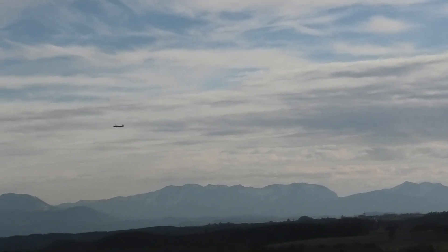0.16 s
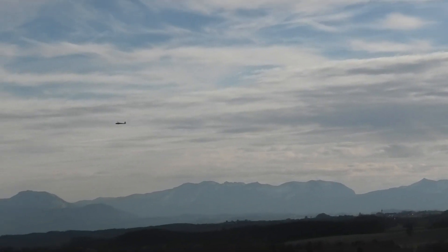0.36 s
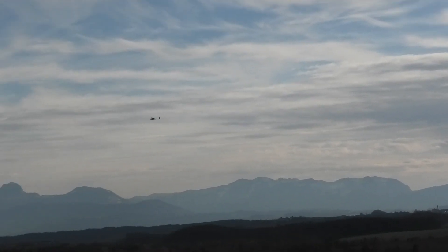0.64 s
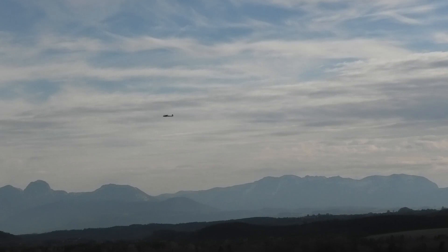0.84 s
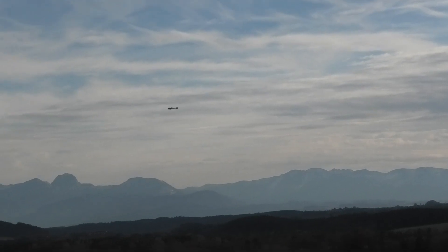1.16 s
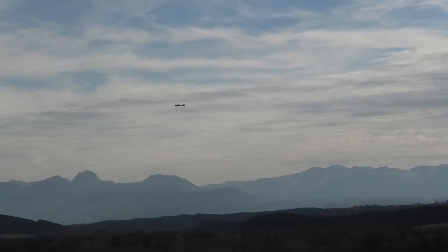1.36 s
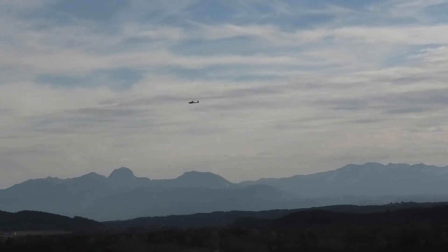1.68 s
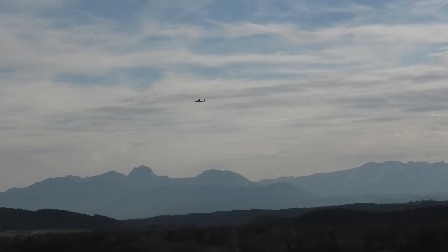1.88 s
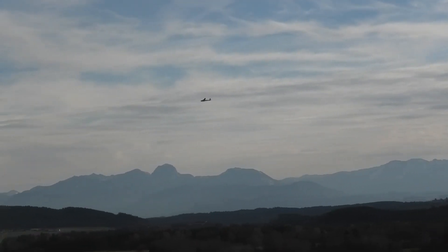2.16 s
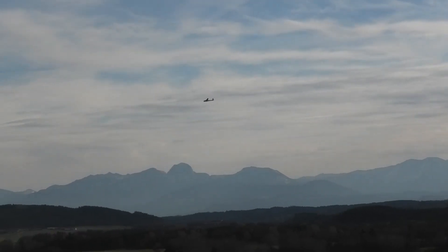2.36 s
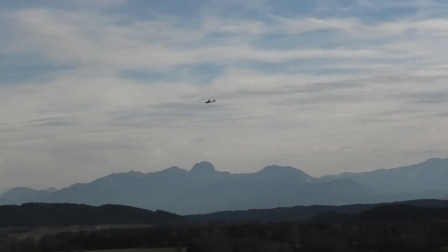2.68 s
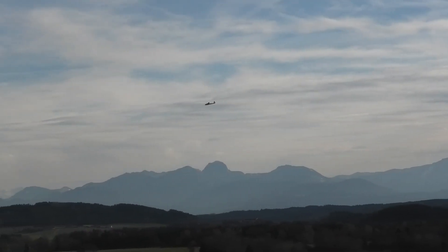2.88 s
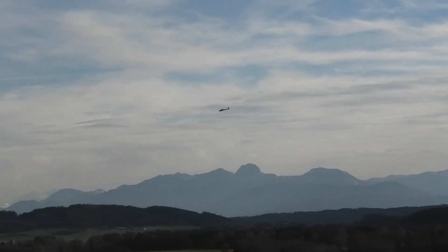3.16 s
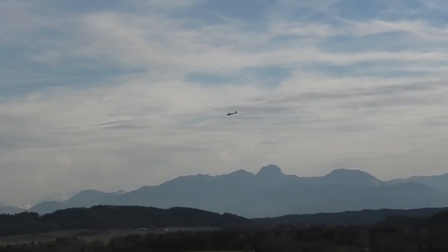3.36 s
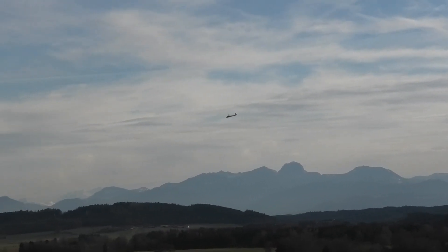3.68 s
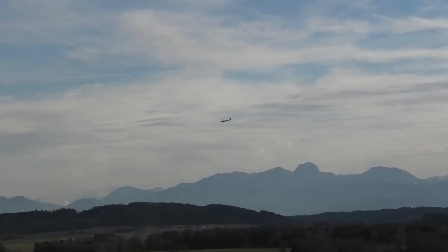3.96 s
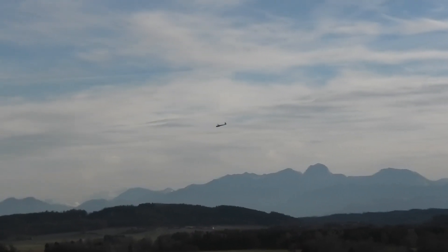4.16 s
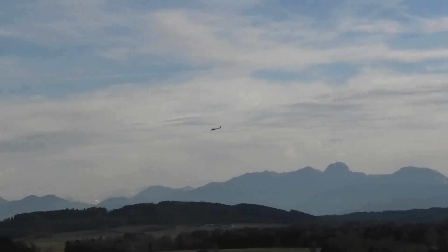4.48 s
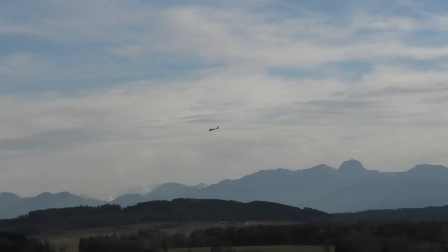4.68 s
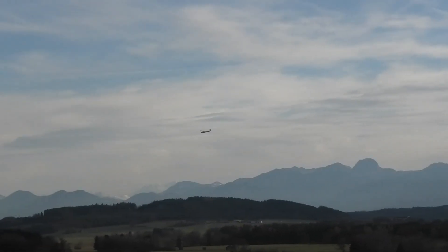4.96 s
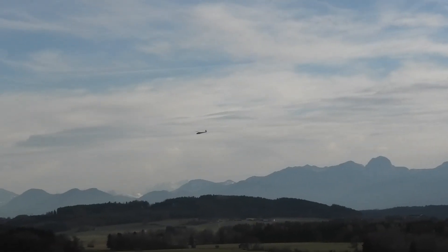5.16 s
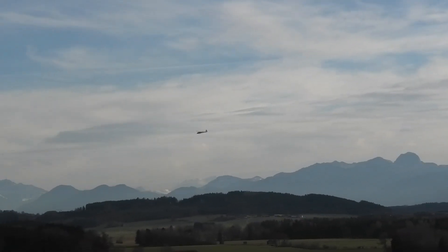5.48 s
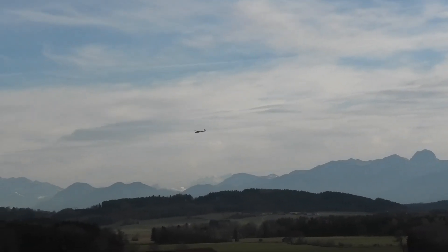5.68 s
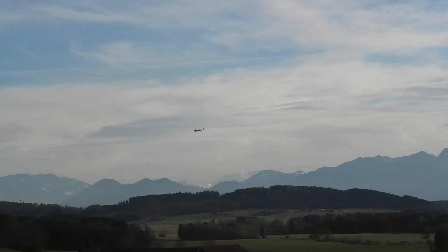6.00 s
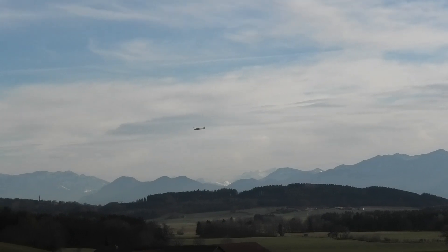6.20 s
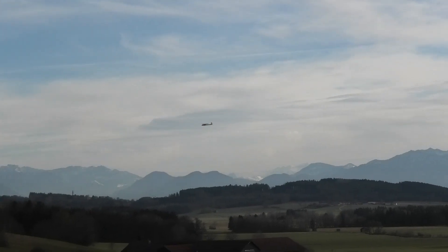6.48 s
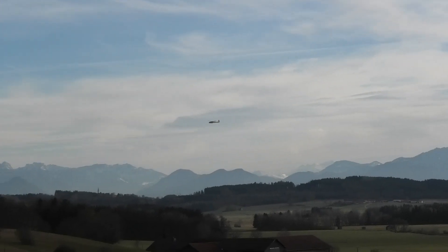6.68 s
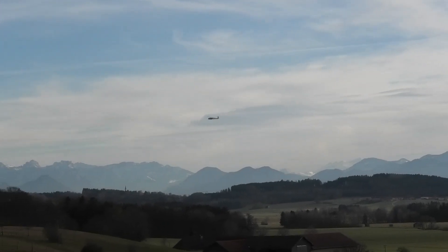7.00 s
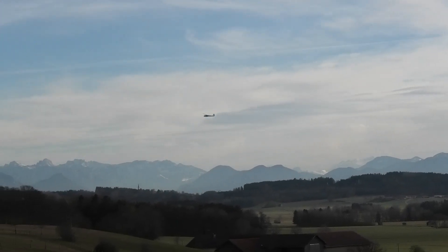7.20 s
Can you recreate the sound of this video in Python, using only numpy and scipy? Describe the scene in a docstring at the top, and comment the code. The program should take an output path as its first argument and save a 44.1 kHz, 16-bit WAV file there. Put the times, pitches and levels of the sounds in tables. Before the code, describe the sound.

Quiet open countryside, with a steady distant roar, light low gusts on the microphone, a very faint thin whine and soft hiss. From the start, a far road vehicle's low exhaust drone, the loudest sound, climbs in pitch and level. At about 2.3 seconds it lifts off with a soft bark and flutters away by 2.9. It pulls again from 3.5 seconds, slower and a little quieter, barks at 6.6 and is gone just after 7. Underneath, a small aircraft hums throughout, its pitch slowly sinking. Faint tones slide upward around 1 second. From 1.5 to 2.8 seconds an animal lows very faintly, rising at the end. Birds on the left give faint, quick, raspy falling chirps from 1 to 7 seconds, bunching near 6.4. A few soft scuffing knocks come slightly left at about 6.8 seconds, with a duller one just before 7.

```python
"""A far vehicle in a valley

A road vehicle far off pulls away through two gears; after each, the driver lifts off and the exhaust
barks and dies away. A small aircraft drones past, its pitch sinking. Birds chirp on the left, an animal
lows, faint tones slide up and something knocks. Under it all lie a distant roar, light wind on the
microphone, a thin whine and the recorder's hiss."""
import sys
import numpy as np
from scipy import signal
from scipy.fft import rfft, irfft
from scipy.io import wavfile
from scipy.ndimage import uniform_filter1d

SR = 44100
rng = np.random.default_rng(int(sys.argv[2]) if len(sys.argv) > 2 else 0)


def int16_out(signal):
    """Quantize to a 16-bit WAV file."""
    q = np.round(np.clip(np.atleast_2d(signal).T, -1, 1) * 32767)
    wavfile.write(sys.argv[1], SR, q.astype(np.int16))


N = 323694
TIME_S = np.arange(N) / SR


def gain_of(db):
    """Turns decibels into a multiplier."""
    return 10 ** (np.asarray(db) / 20)


def unit_rms(x):
    """Scales a signal to an average strength (rms) of 1."""
    return x / np.sqrt(np.mean(x ** 2) + 1e-20)


def value_at(points, hz):
    """Looks up a frequency in a table, blending between rows on a log scale."""
    table_hz, value = np.transpose(points)
    return np.interp(np.log(hz + 1), np.log(table_hz + 1), value)


def follow(rows, fade_s):
    """Gives a gate that fades in and out around a timed table, then its columns at every sample."""
    times, *columns = np.transpose(rows)
    gate = np.clip(np.minimum(TIME_S - times[0], times[-1] - TIME_S) / fade_s + 1, 0, 1)
    return gate, *(np.interp(TIME_S, times, column) for column in columns)


def drift(top_hz):
    """A random wander of strength 1, mostly slower than top_hz."""
    spectrum = rfft(rng.standard_normal(N))
    return unit_rms(irfft(spectrum * np.exp(-(np.fft.rfftfreq(N, 1 / SR) / top_hz) ** 2), N))


def panned(x, left_db):
    """Makes two channels, the left louder than the right by left_db."""
    return np.array([x * gain_of(left_db / 2), x * gain_of(-left_db / 2)])


# How alike the background is in both ears (1 = the same): frequency_hz, likeness
EAR_LIKENESS = [(40, 0.5), (100, 0.84), (210, 0.84), (330, 0.39), (500, 0.53), (770, 0.67), (1170, 0.52),
                (1790, 0.5), (2740, 0.14), (3800, 0.033), (5000, 0.05), (6410, 1), (9000, 0.99),
                (11000, 0.51), (15000, .15)]
# How much louder it is on the left: frequency_hz, left_db
EAR_BALANCE = [(60, -2), (130, 0.5), (290, 1), (640, 0.5), (1410, 1.5), (3100, 1.5), (6820, -0.5),
               (15000, 0.5)]
def noise(colour, patchy_db, flicker_db, likeness=None):
    """Stereo noise of strength 1 that flickers in patches and as a whole."""
    frames, hz = N // 512 + 5, np.fft.rfftfreq(2048, 1 / SR)
    a, b, c, d, patches = rng.standard_normal((frames, 1025, 5)).T
    patches = unit_rms(uniform_filter1d(uniform_filter1d(patches, size=20, axis=0), size=9, axis=1))
    flicker = unit_rms(uniform_filter1d(rng.standard_normal(frames), size=4))
    left_db = 0
    if likeness is None:
        likeness, left_db = value_at(EAR_LIKENESS, hz)[:, None], value_at(EAR_BALANCE, hz)
    left = a + 1j * b
    right = likeness * left + np.sqrt(1 - likeness ** 2) * (c + 1j * d)
    colour_db = np.where((hz < colour[0][0]) | (hz > colour[-1][0]), -120, value_at(colour, hz))
    spectra = np.array([left, right])
    spectra *= gain_of(colour_db[:, None] + patchy_db * patches + flicker_db * flicker)
    spectra *= panned(np.ones(len(hz)), left_db)[:, :, None]
    return unit_rms(signal.istft(spectra, nperseg=2048, noverlap=1536)[1][:, :N])


# The tone colour of the hiss: frequency_hz, relative_db
HISS_COLOUR = [(2060, -18), (3500, 0), (5330, -8), (6430, -9), (11200, 0), (15100, 0.5), (15700, -2.5)]
def hiss():
    """The recorder's own smooth, high hiss."""
    return gain_of(-68.5) * noise(HISS_COLOUR, patchy_db=.15, flicker_db=.15)


# The tone colour of the roar: frequency_hz, relative_db
ROAR_COLOUR = [(20, -43), (35, -16), (55, 7), (86, 6), (192, 2), (260, -5), (374, -8), (471, -7.5),
               (745, -11), (900, -9.5), (1210, -11.5), (1950, -15.5), (3000, -25), (6000, -39.5)]
# How the roar changes: time_s, level_db, treble_db
ROAR_CURVE = [(0, -49, -1.5), (2.7, -48, -1), (3.3, -49.8, 0), (4.2, -50.5, 1), (4.55, -50.5, -1.5),
              (4.78, -49, -0.5), (5., -50.5, 0.5), (6.5, -50, 1.5), (6.87, -49, 0.5), (7.34, -49.5, -0.5)]
def roar():
    """A distant roar whose treble comes and goes."""
    _, level_db, treble_db = follow(ROAR_CURVE, fade_s=.1)
    rumble = noise(ROAR_COLOUR, patchy_db=1., flicker_db=.4)
    treble = signal.sosfiltfilt(signal.butter(2, 1400, "high", fs=SR, output="sos"), rumble)
    return (rumble + (gain_of(treble_db) - 1) * treble) * gain_of(level_db)


# The tone colour of the wind: frequency_hz, relative_db
WIND_COLOUR = [(20, -40), (32, -18), (45, -3), (60, 0), (90, -6), (140, -15), (220, -23), (350, -36)]
# Gusts that swell and fall: middle_s, half_width_s, level_db
WIND_GUSTS = [(.8, .2, -58), (2.45, .3, -52), (3.15, .2, -54), (3.7, .12, -56), (4.7, .2, -56),
              (6.1, .2, -50), (6.7, .35, -51)]
def wind():
    """A gusty breeze presses on one microphone opening as it eases off the other."""
    breeze = gain_of(-67)
    gusts = sum(gain_of(db) * np.exp(-((TIME_S - middle_s) / half_s) ** 2)
                for middle_s, half_s, db in WIND_GUSTS)
    return noise(WIND_COLOUR, patchy_db=1.5, flicker_db=1.5, likeness=-.25) * (breeze + gusts)


# A faint high tone: pitch_hz, level_db
WHINE_TONE = [(1626, -77)]
def whine():
    """A thin tone, steady in pitch, that wavers in level."""
    return np.sqrt(2) * sum(gain_of(db + 3.3 * drift(5.8)) * np.sin(2 * np.pi * hz * TIME_S)
                            for hz, db in WHINE_TONE)


def glides(rows, rasp, left_db, echo_db):
    """Short gliding whistles with a weak blur of echoes behind them."""
    tones = np.zeros(N, complex)
    for middle_s, hz, fall_hz, length_s, db in rows:
        position = np.linspace(-.5, .5, round(length_s * SR))
        tone = np.exp(2j * np.pi * np.cumsum(hz - fall_hz * position) / SR) * np.cos(np.pi * position)
        start = round(middle_s * SR) - len(tone) // 2
        tones[start:start + len(tone)] += np.sqrt(2) * gain_of(db) * tone
    # the rasp shakes the pitch, and the strength a little
    whistles = (tones * np.exp(rasp * (.2 * drift(120) + 1j * drift(120)))).real
    t = np.arange(6000) / SR
    echo_tail = rng.standard_normal((2, len(t))) * gain_of(-60 * t / .51) * (t > .008)
    echo_tail /= np.linalg.norm(echo_tail[0])
    echoes = signal.oaconvolve(whistles[None], echo_tail, axes=1)[:, :N]
    return panned(whistles, left_db) + gain_of(echo_db) * echoes


# Rising tones (a fall below zero is a rise): middle_s, pitch_hz, fall_hz, length_s, level_db
RISING_TONES = [(1.01, 605, -70, .17, -63), (1.05, 540, -50, .12, -66), (1.17, 590, -110, .1, -65)]
def sliding_tones():
    """Faint low tones slide upward."""
    return glides(RISING_TONES, rasp=.4, left_db=0, echo_db=-6)


def drone(rows, multiples, colour, wobble, waver_db, left_db):
    """Tones at multiples of one wavering pitch, each flickering in the moving air."""
    gate, hz, level_db = follow(rows, fade_s=.074)
    cycles = np.cumsum(hz * (1 + wobble * drift(5.06))) / SR
    tones = np.zeros(N)
    for k in multiples:
        strength = gain_of(value_at(colour, k * hz) + waver_db * drift(2.9))
        tones += strength * np.cos(2 * np.pi * (k * cycles + rng.random()))
    return panned(np.sqrt(2) * tones * gate * gain_of(level_db), left_db)


# The animal's call: time_s, pitch_hz, base_level_db
LOWING_CALL = [(1.5, 190, -70), (2.05, 193.5, -71), (2.2, 194.5, -68), (2.5, 196, -68.5), (2.58, 199, -73),
               (2.68, 217, -67), (2.77, 229, -66), (2.84, 231, -71)]
# The tone colour of its voice: frequency_hz, boost_db
VOICE_COLOUR = [(385, -3), (450, 6), (580, 0), (680, -12), (775, 0), (910, -4), (975, 2), (1120, -1),
                (1170, -6), (1400, -20)]
def lowing_animal():
    """One long call that rises at the end, heard only in its overtones."""
    return drone(LOWING_CALL, range(2, 7), VOICE_COLOUR, wobble=.009, waver_db=3, left_db=1.5)


# One row a chirp: middle_s, pitch_hz, fall_hz, length_s, level_db
BIRD_CHIRPS = [(1.045, 2250, 700, .04, -63), (1.99, 2550, 444, 0.058, -66), (2.075, 2500, 750, .04, -62.5),
               (2.228, 2090, 450, .04, -66), (2.33, 2600, 447, .045, -65.5), (2.451, 1980, 500, 0.033, -67),
               (2.734, 2210, 350, .035, -62), (2.79, 2557, 500, .045, -67), (2.995, 1980, 450, .04, -66),
               (3.093, 2010, 500, .04, -58.5), (3.116, 2580, 550, 0.04, -62), (3.152, 2490, 200, .02, -61),
               (3.622, 1990, 253, .035, -61.5), (3.968, 2390, 350, .04, -69),
               (4.075, 2045, 500, .042, -59.5), (4.295, 2330, 300, .03, -68),
               (4.375, 2200, 400, .03, -65.5), (4.965, 2230, 500, .03, -66), (5.243, 2340, 350, 0.032, -65),
               (5.509, 2200, 600, .05, -60), (5.896, 2060, 500, .042, -59.5),
               (6.162, 1455, 300, 0.033, -56.5), (6.393, 2320, 850, .035, -58.5),
               (6.405, 3050, 700, .03, -69), (6.412, 1580, 300, .03, -57), (6.418, 2250, 350, .028, -60),
               (6.44, 2000, 250, .022, -63), (6.527, 2210, 300, .028, -62), (6.967, 2170, 350, .025, -61)]
def birds():
    """Birds on the left give quick, raspy, falling chirps."""
    return glides(BIRD_CHIRPS, rasp=.9, left_db=6, echo_db=-4)


# One row a blow: start_s, level_db, dullness_db_per_khz
BLOWS = [(6.757, -53, 4.), (6.766, -47, 1.5), (6.803, -54, 4.), (6.953, -58, 12.)]
# The tones the struck thing rings with: pitch_hz, relative_db, ring_s (time to fade by 60 dB)
RING_TONES = [(520, -1, .06), (690, 0, .045), (900, -3, .04), (1220, -2, .035), (1420, 0, .03),
              (1630, -3, .03), (2250, -12, .03), (2950, -24, .02)]
def knocks():
    """Scuffing blows, each a short burst of noise, set the same tones ringing."""
    t, track = np.arange(5000) / SR, np.zeros(N)
    for start_s, level_db, dullness in BLOWS:
        ring = sum(gain_of(db - dullness * hz / 1000 - 60 * t / ring_s) * np.sin(2 * np.pi * hz * t)
                   for hz, db, ring_s in RING_TONES)
        ring *= 1 - np.exp(-(t / .0006) ** 2)  # a blunt contact has no bright edge
        scuff = t * np.exp(-t / .004)
        rattle = .0006 * np.exp(-t / .06) * (t > .008)
        blow = signal.fftconvolve(ring, rng.standard_normal(len(t)) * (scuff + rattle))[:len(t)]
        start = round(start_s * SR)
        track[start:start + len(t)] += gain_of(level_db) * blow / np.sqrt(np.mean(blow[:900] ** 2))
    return panned(track, left_db=4.1)


# The aircraft going past: time_s, firing_rate_hz, base_level_db
FLYBY = [(0, 92.74, -52.5), (.6, 91.74, -52), (1.0, 91.4, -63), (1.4, 91.1, -50.5), (2.4, 88.73, -58.5),
         (4.4, 84.66, -52.5), (5.6, 82.8, -52.5), (6.4, 82, -53.5), (7.34, 80.2, -56)]
# The tone colour of its drone: frequency_hz, boost_db
FLYBY_COLOUR = [(85, -1.5), (170, -5.5), (240, -13)]
def aircraft():
    """A small aircraft's engine and propeller drone, slowly sinking in pitch."""
    multiples = (1, 2, 2.83)  # the firing rate, its octave and the propeller's tone
    return drone(FLYBY, multiples, FLYBY_COLOUR, wobble=.002, waver_db=1.5, left_db=.3)


def throttle(pull_s, lift_s, first_hz, top_hz, pitch_bend, sag_hz_per_s,
             first_db, top_db, swell_bend, bark_rise_s, fade_db_per_s):
    """Pitch and level climb under load; after lift-off the pitch sags and the exhaust barks and dies."""
    bark_db, bark_s, coast_s = 3, .25, .455
    climb = np.clip((TIME_S - pull_s) / (lift_s - pull_s), 0, 1)
    after_s = np.maximum(TIME_S - lift_s, 0)
    bark = np.minimum(after_s / bark_rise_s, 1)
    dying_s = np.maximum(after_s - bark_s, 0)
    gate = np.clip(np.minimum(TIME_S - pull_s, lift_s + coast_s - TIME_S) / .14 + 1, 0, 1)
    hz = first_hz + (top_hz - first_hz) * climb ** pitch_bend - sag_hz_per_s * np.minimum(after_s, 1)
    level_db = first_db + (top_db - first_db) * climb ** swell_bend
    level_db += bark_db * bark - fade_db_per_s * dying_s
    roughness = np.clip(.03 + .04 * bark + .7 * dying_s, 0, 1)  # even under load, fluttering as it dies
    return gate, hz, level_db, roughness


# How the exhaust reaches the two ears: frequency_hz, left_db, left_lead_radians
EXHAUST_AT_EARS = [(60, 0, 0.038), (139, .5, -0.25), (250, -3, -0.81), (400, -7.5, -0.81)]
def exhaust(gear, pipe_colour):
    """Firing pulses coloured by the pipe; uneven firings and scattered paths shake each tone."""
    gate, hz, level_db, roughness = throttle(*gear)
    firings = np.cumsum(hz) / SR
    uneven = drift(27)  # strength changes from firing to firing
    ear_hz, left_db, left_lead = np.transpose(EXHAUST_AT_EARS)
    tones = np.zeros((2, N))
    for k in (1, 1.5, 2, 2.5, 3, 4, 5, 6):
        half_db = -23 if k % 1 else 0  # strong and weak firings alternate, adding faint in-between tones
        scatter = drift(5.3) + 1j * drift(13)
        sway = 1 + roughness * (uneven + scatter)
        tone = sway * np.exp(1j * (2 * np.pi * k * firings + 1.7))  # all in step: a push, then a pull
        tone *= gain_of(value_at(pipe_colour, k * hz) + half_db)
        left, right = panned(tone, np.interp(k * hz, ear_hz, left_db))
        left *= np.exp(1j * np.interp(k * hz, ear_hz, left_lead))
        tones += [left.real, right.real]
    return np.sqrt(2) * tones * gate * gain_of(level_db)


# One row a gear (a bend above 1 makes the climb start slowly): pull_s, lift_s, first_hz, top_hz,
# pitch_bend, sag_hz_per_s, first_db, top_db, swell_bend, bark_rise_s, fade_db_per_s
GEAR_PULLS = [(0, 2.31, 57.08, 76.28, 1.12, 7.64, -51, -38, 0.71, 0.071, 66),
              (3.52, 6.56, 56.77, 70.01, 1.45, 1.84, -53, -42.5, 1.02, 0.19, 66)]
# The tone colour of the exhaust pipe in each gear: frequency_hz, boost_db
LOW_GEAR_COLOUR = [(55, -2.5), (75, -5.5), (115, 3), (150, 0), (175, 0), (225, -12.5), (300, -17),
                   (380, -32), (600, -44)]
HIGH_GEAR_COLOUR = [(55, -1), (70, -4.5), (115, 4.5), (140, -0.5), (172, 1), (185, -1), (210, -9),
                    (240, -19), (280, -14), (350, -25), (420, -34)]
def vehicle():
    """A far road vehicle pulls away through two gears, heard by its exhaust."""
    return exhaust(GEAR_PULLS[0], LOW_GEAR_COLOUR) + exhaust(GEAR_PULLS[1], HIGH_GEAR_COLOUR)


def scene():
    """Everything that reaches the microphone, added up."""
    background = roar() + wind() + whine() + sliding_tones()
    return background + lowing_animal() + birds() + knocks() + aircraft() + vehicle()


def record(dry):
    """Adds the hiss, then cuts off the very highest treble."""
    cutoff_hz = 15780
    low_pass = signal.firwin(1023, cutoff_hz, window=("kaiser", 11), fs=SR)
    return signal.oaconvolve(dry + hiss(), low_pass[None], "same")


dry = scene()
out = record(dry)
int16_out(out)
```